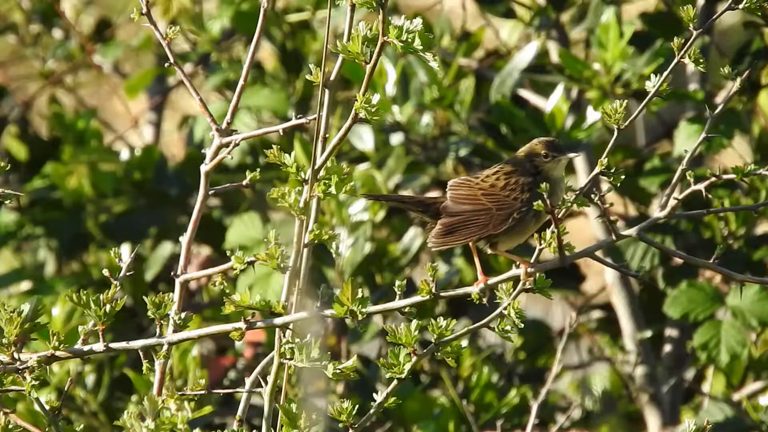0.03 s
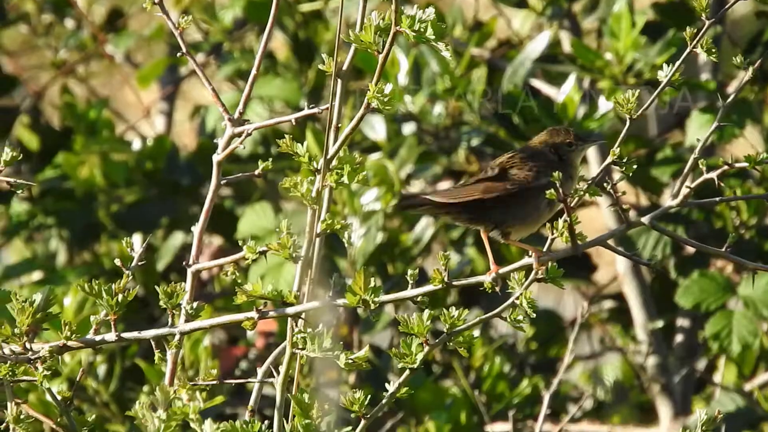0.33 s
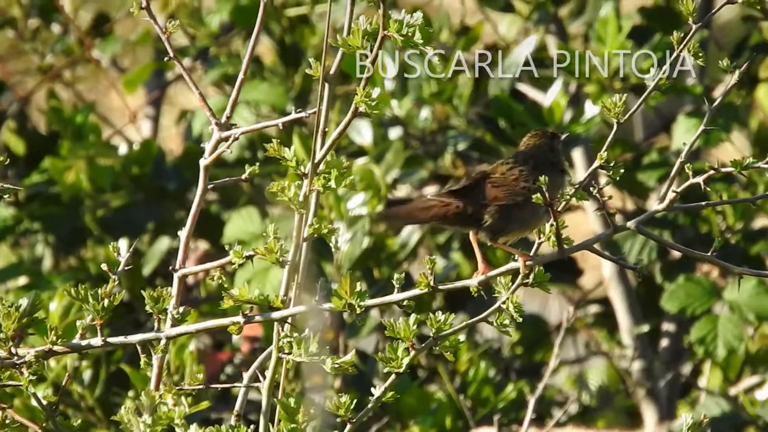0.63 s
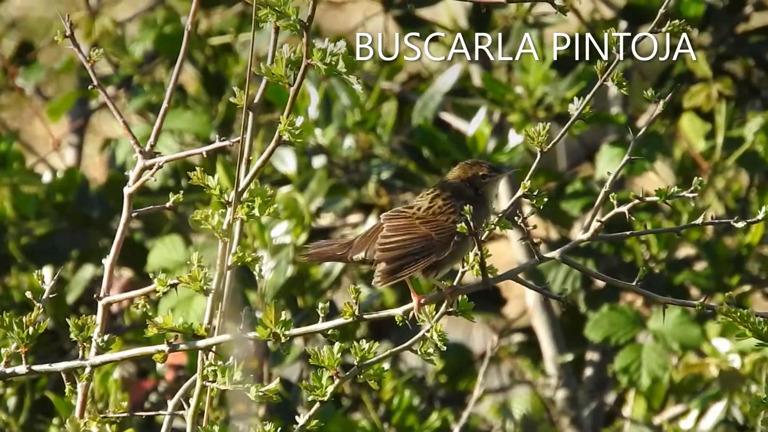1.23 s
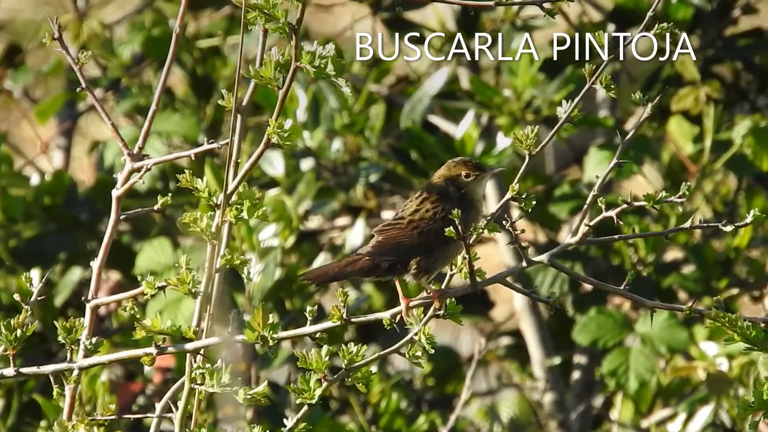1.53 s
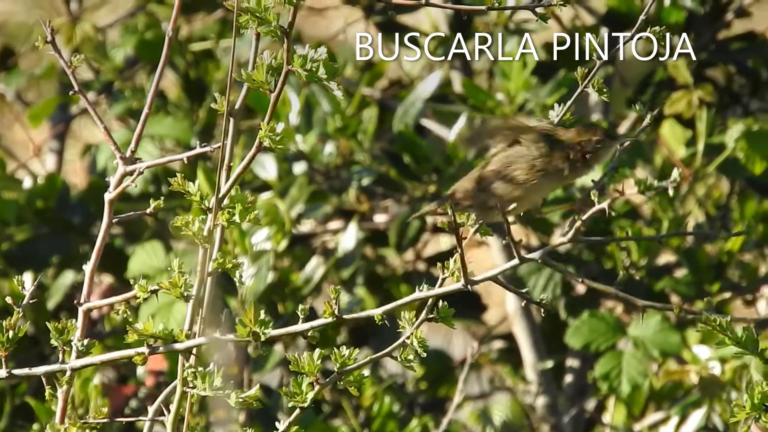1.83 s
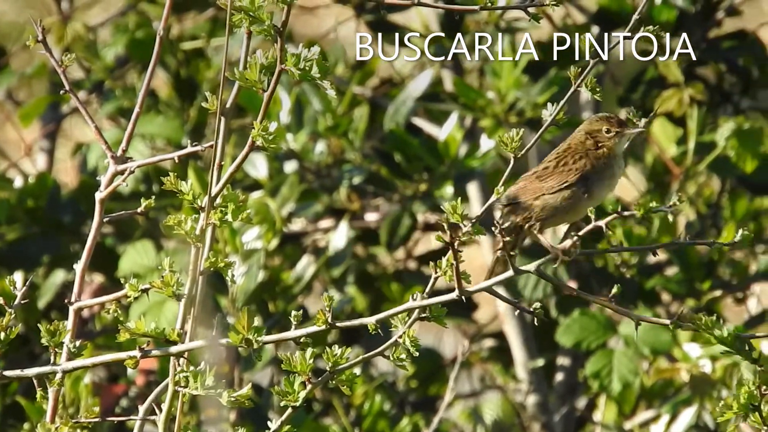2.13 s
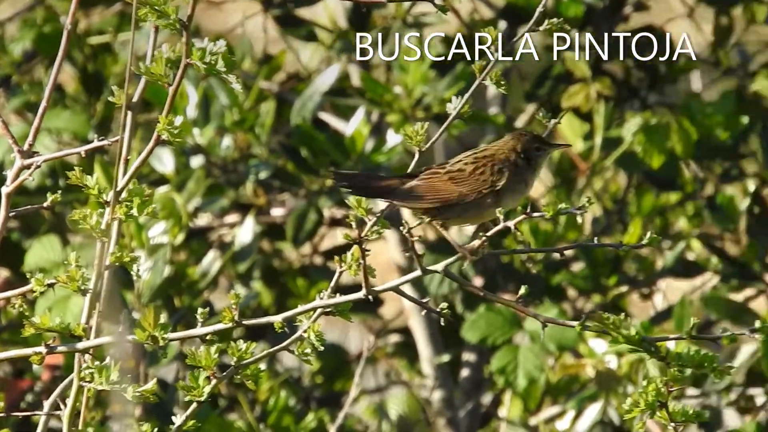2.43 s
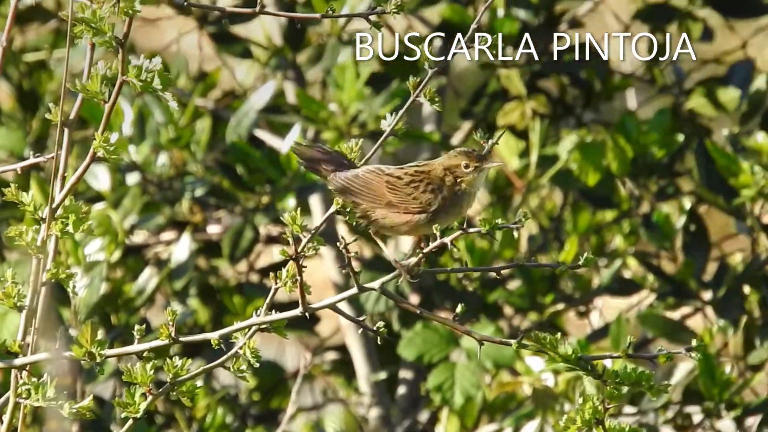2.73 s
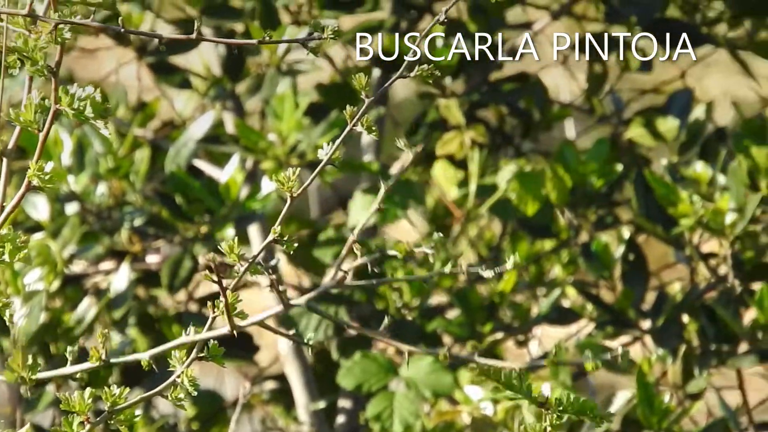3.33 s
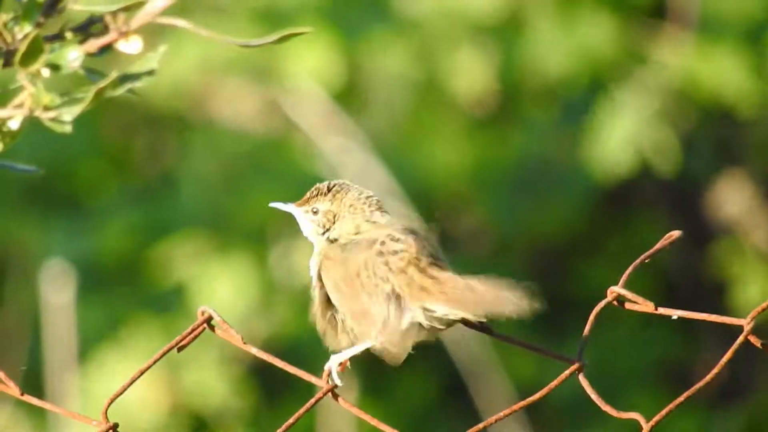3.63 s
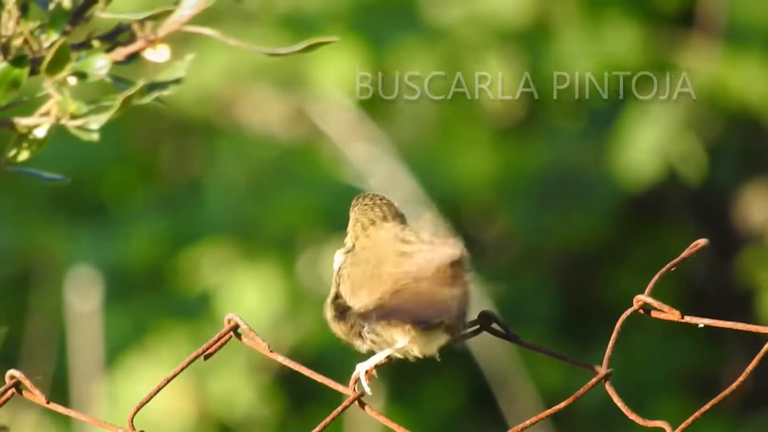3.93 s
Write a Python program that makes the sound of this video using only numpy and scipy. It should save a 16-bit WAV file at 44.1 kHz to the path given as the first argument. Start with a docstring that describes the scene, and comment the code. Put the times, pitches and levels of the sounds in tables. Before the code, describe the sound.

A warbler reels a rapid high trill outdoors, with faint chirps and far traffic.

```python
"""A grasshopper warbler in a hedge

The two sides of the bird's syrinx sound together, chips against an arched whistle, about twelve
times a second; the reel swells and stops. Other small birds add high 'tsip' calls and thin falling
whistles, all frequency-modulated tones scattered by leaves. Behind them a distant road rushes and
drones as filtered noise. Near the end the scene fades to a quieter spot with one more whistle."""
import sys
import numpy as np
from scipy import signal
from scipy.fft import rfft, irfft
from scipy.io import wavfile
from scipy.ndimage import uniform_filter1d

SR = 44100
rng = np.random.default_rng(int(sys.argv[2]) if len(sys.argv) > 2 else 0)


def pcm_store(signal):
    """Save signal as 16-bit PCM."""
    levels = np.round(np.clip(np.atleast_2d(signal), -1, 1) * 32767)
    wavfile.write(sys.argv[1], SR, levels.astype(np.int16).T)


N = 176400
T = np.arange(N) / SR
FREQS = np.maximum(np.fft.rfftfreq(N, 1 / SR), 1)
NEAR_WET_DB, FAR_WET_DB = -16, -9  # scattered sound relative to direct sound


def undb(db):
    """The decibel scale: amplitude grows tenfold every 20 dB."""
    return 10 ** (np.asarray(db) / 20)


def curve(table):
    """Linear interpolation of (seconds, value) rows over time."""
    return np.interp(T, *np.array(table).T)


def spectrum(table):
    """A spectral envelope: gains from (Hz, dB) rows, interpolated over log frequency."""
    hz, db = np.array(table).T
    return undb(np.interp(np.log(FREQS), np.log(hz), db))


def fade(start_s, end_s):
    """A raised-cosine ramp from 0 to 1."""
    return np.sin(np.pi / 2 * np.clip((T - start_s) / (end_s - start_s), 0, 1)) ** 2


def noise(gain):
    """Spectral shaping: white noise weighted by a gain per frequency, scaled to rms 1."""
    x = irfft(rfft(rng.standard_normal(N)) * gain, N)
    return x / x.std()


def drift(cutoff_hz):
    """Slow random modulation: low-passed noise of rms 1."""
    return noise(1 / (1 + (FREQS / cutoff_hz) ** 4))


def resonance(hz, width_hz):
    """Magnitude response of two equal second-order resonators in cascade."""
    return 1 / (1 + ((FREQS ** 2 - hz ** 2) / (FREQS * width_hz)) ** 2)


def pan(db):
    """Interaural level difference: two gains, the left exceeding the right by db."""
    return undb(np.array([[1], [-1]]) * db / 2)


def place(x, pan_db, lag_samples):
    """Interaural level and time differences; a positive lag delays the right ear."""
    delayed = irfft(rfft(x) * np.exp(-2j * np.pi * FREQS * lag_samples / SR), N)
    return np.array([x, delayed]) * pan(pan_db)


def distant(gain):
    """Partial coherence: far noise of rms 1, alike in both ears in the midrange, wider in the treble."""
    # Each row: frequency in Hz, side level relative to mid in dB.
    width = [(70, -11.5), (250, -18), (600, -23), (1400, -13.5), (7000, -1.5)]
    # Each row: frequency in Hz, left minus right in dB.
    balance = [(60, -0.76), (700, 0.82), (1300, -1.6), (4000, -0.031)]
    mid, side = rfft(rng.standard_normal((2, N)))
    sign = np.array([[1], [-1]])
    ears = mid + sign * side * spectrum(width)
    x = irfft(gain * ears * spectrum(balance) ** (sign / 2), N)
    return x / x.std()


def hiss():
    """Stationary noise, partly correlated: one part common to both ears, one independent in each."""
    # Each row: frequency in Hz, relative level in dB.
    colour = [(8000, 0), (10500, -4), (15500, -10.5)]
    common = noise(spectrum(colour))
    separate = np.array([noise(spectrum(colour)) for _ in range(2)])
    return undb(-61.5) * (0.51 * common + 0.86 * separate)


def hum(hz, waver_hz, flutter_db):
    """A far machine's tone under slow random frequency and amplitude modulation."""
    pitch = hz + waver_hz * drift(8.2)
    return np.sqrt(2) * np.sin(2 * np.pi * np.cumsum(pitch) / SR) * undb(flutter_db * drift(6.2))


def engine(drone_hz=215):
    """A tone at the firing rate, with a narrow noise band (the drone) and a broad one (the roar)."""
    # Each row: time in seconds, level in dB.
    levels = [(.21, -47), (.25, -35), (.38, -42.5), (.54, -44.5), (.7, -39.5), (.87, -48), (1.0, -44.5),
              (1.4, -54), (1.7, -48), (2.1, -51), (2.4, -61)]
    firing = undb(-5.5) * hum(206.5, waver_hz=3.9, flutter_db=3.5)
    roar = undb(-8.5) * distant(resonance(drone_hz, width_hz=440))
    drone = distant(resonance(drone_hz, width_hz=56))
    return (drone + firing + roar) * undb(curve(levels))


def tyre_rush(crossover_hz=1830, flutter_db=0.62):
    """Broadband tyre noise, amplitude-modulated by the air; it brightens and drifts to the centre."""
    # Each row: frequency in Hz, relative level in dB.
    colour = [(60, -27), (110, -8.5), (290, -7.5), (380, -12), (720, -4), (930, 0), (1250, -3.5),
              (2100, -14), (3100, -28), (5600, -37), (15500, -60)]
    # Each row: time in seconds, level in dB.
    levels = [(.22, -34.5), (.31, -32), (.37, -34), (1.45, -34), (2.1, -37.5), (2.5, -36), (3.15, -39),
              (3.555, -37.5), (3.57, -34.5), (3.6, -38)]
    # Each row: time in seconds, gain above the crossover in dB.
    treble_gains = [(.6, -1.5), (2.3, 1)]
    # Each row: time in seconds, left minus right in dB.
    balance = [(.5, -1.4), (1.7, .5)]
    rush = distant(spectrum(colour))
    treble = irfft(rfft(rush) / (1 + (crossover_hz / FREQS) ** 6), N)
    rush = rush - treble + treble * undb(curve(treble_gains))
    return rush * undb(curve(levels) + flutter_db * drift(10.6)) * pan(curve(balance))


def road():
    """Superposition of independent sources: engine, deep rumble, thin whine, dying rustle and tyres."""
    # Three envelopes. Each row: time in seconds, level in dB.
    rumble_levels = [(.5, -49.5), (1.3, -54.5), (1.5, -67), (2.1, -64), (2.3, -55), (3.3, -52.5),
                     (3.6, -64)]
    whine_levels = [(1.0, -58.5), (2.3, -52), (3.2, -60)]
    rustle_levels = [(.3, -57.5), (1.7, -76)]
    drone = engine()
    rumble = distant(resonance(63.2, width_hz=29)) * undb(curve(rumble_levels))
    whine = hum(490.6, waver_hz=3.77, flutter_db=4.0) * undb(curve(whine_levels))
    rustle = distant(resonance(4320, width_hz=1040)) * undb(curve(rustle_levels))
    return tyre_rush() + drone + rumble + whine + rustle


def hedge(x, wet_db, t60_s=0.3):
    """Scattering by leaves and twigs: convolution adds a short, exponentially decaying tail."""
    t = T[:SR // 2]
    tail = rng.standard_normal((2, len(t))) * np.exp(-np.log(1000) * t / t60_s)
    tail /= np.sqrt(np.sum(tail ** 2, axis=1, keepdims=True))
    return x + undb(wet_db) * signal.fftconvolve(x, tail, axes=1)[:, :N]


def sing(times, hz, db, rough, waver=0.051):
    """A sine follows pitch and level contours; random modulation of both is heard as roughness."""
    times = np.sort(times)
    start, end = int(times[0] * SR), int(times[-1] * SR)
    smooth = lambda v: uniform_filter1d(v, size=40)
    shake = smooth(smooth(rng.standard_normal((2, SR // 2))))[:, :end - start]
    jitter, shimmer = rough * shake / shake.std()
    pitch = smooth(np.interp(T[start:end], times, hz)) * (1 + waver * jitter)
    gain = smooth(undb(np.interp(T[start:end], times, db))) * (1 + shimmer)
    gain *= signal.windows.tukey(end - start, .05)
    out = np.zeros(N)
    out[start:end] = np.sqrt(2) * gain * np.sin(2 * np.pi * np.cumsum(pitch) / SR)
    return out


def note(shape, start, level_db, rough, transpose=1, scatter_db=1.0, scatter_hz=30):
    """Random variation of a contour's pitch and level: no note is sung twice quite alike."""
    ms, hz, db = np.array(shape).T
    pitch_chance, level_chance = rng.standard_normal((len(ms), 2)).T
    hz = hz * transpose + scatter_hz * pitch_chance
    db = db + level_db + scatter_db * level_chance
    return sing(start + ms / 1000, hz, db, rough)


def quiet_spot():
    """Faint broadband traffic noise and a narrow band of engine hum beneath one falling whistle."""
    # Each row: time in seconds, pitch in Hz, level in dB.
    contour = [(3.63, 7900, -59), (3.69, 7820, -51), (3.77, 7700, -56), (3.80, 7660, -55),
               (3.85, 7440, -84)]
    # The traffic's spectrum. Each row: frequency in Hz, relative level in dB.
    colour = [(25, -26), (70, -2), (330, -5), (800, 1.5), (1500, -2.5), (2600, -21), (15500, -40)]
    whistle = place(sing(*np.array(contour).T, rough=.08), pan_db=-2.7, lag_samples=-1.2)
    traffic = undb(-46) * distant(spectrum(colour))
    idle = undb(-55.5) * distant(resonance(72.5, width_hz=9.8))
    return traffic + idle + hedge(whistle, NEAR_WET_DB)


def whistles():
    """Thin downward glides on the right: one contour, stretched in time to each length."""
    # Each row: start in seconds, length in seconds, level in dB.
    calls = [(0.739, 0.33, -54), (2.16, .43, -57.5)]
    # Each row: fraction of the length, pitch in Hz, relative level in dB.
    shape = [(0, 9700, -2), (.07, 9050, -1.5), (.54, 7970, -1.5), (.78, 7830, -2.5), (1, 7620, -8)]
    fraction, hz, db = np.array(shape).T
    song = sum(sing(start + fraction * length, hz, db + level, rough=0.18, waver=0.029)
               for start, length, level in calls)
    return place(song, pan_db=-6.5, lag_samples=2.0)


def tsips():
    """Calls on the right: a tick, a gap, then a note that buzzes with fast random modulation."""
    # Each row: start in seconds, level in dB.
    calls = [(.470, -51.5), (1.3715, -51.5), (2.340, -48)]
    # Each row: time in milliseconds, pitch in Hz, relative level in dB.
    shape = [(-1.5, 7900, -6), (1, 7650, 3), (7.5, 7700, -35), (22, 8300, -30), (25, 7750, -1),
             (33, 7720, -1.5), (54.5, 7550, -4.5), (72, 6400, -19)]
    song = sum(note(shape, start, level, rough=0.26) for start, level in calls)
    return place(song, pan_db=-7.5, lag_samples=1.7)


def left_birds():
    """Frequency-modulated tones on the left: soft arched replies, a far chirp and a far low call."""
    # Each row: start in seconds, level in dB.
    calls = [(.80, -62), (1.546, -58), (3.09, -58)]
    # One reply. Each row: time in milliseconds, pitch in Hz, relative level in dB.
    shape = [(-1.5, 7400, 4), (12, 6100, -34), (30, 7250, -4), (41, 7480, -3.5), (70.5, 7050, -5.5),
             (78, 6200, -13)]
    # Two contours. Each row: time in seconds, pitch in Hz, level in dB.
    chirp = [(2.955, 4650, -61), (2.965, 5150, -58), (2.973, 4950, -64), (2.981, 5400, -58),
             (2.988, 5800, -61), (2.996, 4400, -63)]
    low_call = [(2.682, 3680, -63), (2.715, 3470, -62), (2.727, 3400, -72), (2.74, 3350, -60)]
    replies = sum(note(shape, start, level, rough=.25) for start, level in calls)
    far_calls = sum(sing(*np.array(call).T, rough=0.32) for call in (chirp, low_call))
    return place(replies + far_calls, pan_db=8, lag_samples=0.55)


def reel_note(start, hz, db, reference_hz=5102, full_voice_db=-54, swell_ms=25, rough=0.08):
    """Biphonation: both sides of the syrinx sound, and the chips rasp where they overlap the whistle."""
    # One side gives a faint lead-in and two chips, the other an arched whistle.
    # Each row: time in milliseconds, pitch before transposition in Hz, relative level in dB.
    chips_shape = [(-1, 4600, -14), (3.5, 4650, -16), (5.5, 4130, -4), (8.3, 4364, 4.5), (11.5, 4100, -16),
                   (14, 4650, 0), (17.5, 3950, -7)]
    arch_shape = [(11.5, 5250, -14), (14, 5130, -7), (22, 5030, -3), (30, 5123, 0), (39, 5070, -0.5),
                  (46.5, 4560, 0.5), (51, 4250, -18)]
    transpose = hz / reference_hz
    push_db = db - full_voice_db
    # Louder and higher notes have stronger chips.
    chips_db = db - 4.5 + 0.5 * push_db + 0.0342 * (hz - reference_hz)
    chips_start = start + 0.0005 * rng.standard_normal()
    chips = note(chips_shape, chips_start, chips_db, rough, transpose)
    # Below full voice the whistle starts weakly and swells in.
    onset_db = 2 * min(push_db, 0)
    arch = [(ms, pitch, level + onset_db * (ms < swell_ms)) for ms, pitch, level in arch_shape]
    return chips + note(arch, start, db, rough, transpose)


def warbler():
    """A nearly periodic train of notes is heard as a reel, close and almost straight ahead."""
    # Each row: start in seconds, pitch in Hz, relative level in dB.
    notes = [(0.8921, 5110, -58.5), (0.9745, 5090, -58), (1.0526, 5090, -55.5), (1.1305, 5050, -55.5),
             (1.2103, 5020, -53), (1.289, 5020, -50), (1.3683, 5150, -48.5), (1.4497, 5120, -47.5),
             (1.528, 5120, -47), (1.6074, 5140, -46.5), (1.6857, 5080, -45.5), (1.7659, 5140, -45),
             (1.845, 5140, -45), (1.926, 5110, -45.5), (2.0049, 5020, -46.5), (2.0873, 5120, -46.5),
             (2.17, 5100, -46.5), (2.25, 5150, -47.5), (2.3306, 5040, -47.5), (2.4108, 5080, -48),
             (2.4961, 5050, -48.5)]
    return undb(1) * sum(reel_note(*row) for row in notes) * pan(-1.5)


def scene():
    """Sources add linearly: the hedge by the road, then the quiet spot, each over an even hiss."""
    floor = hiss()
    reel = hedge(warbler(), NEAR_WET_DB)
    neighbours = hedge(whistles() + tsips() + left_birds(), FAR_WET_DB)
    roadside = (reel + neighbours + road() + floor) * fade(0.13, 0.16) * (1 - fade(3.572, 3.615))
    return roadside + (quiet_spot() + floor) * fade(3.626, 3.656)


def record(dry, cutoff_hz=15700):
    """Band limiting: an elliptic low-pass cuts the highest treble steeply."""
    return signal.sosfilt(signal.ellip(10, .1, 70, cutoff_hz, fs=SR, output="sos"), dry)


dry = scene()
out = record(dry)
pcm_store(out)
```